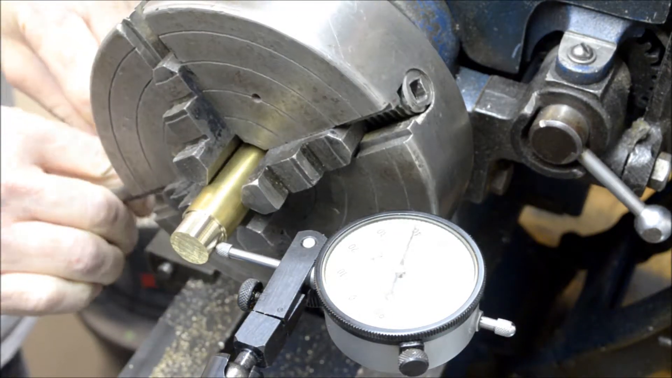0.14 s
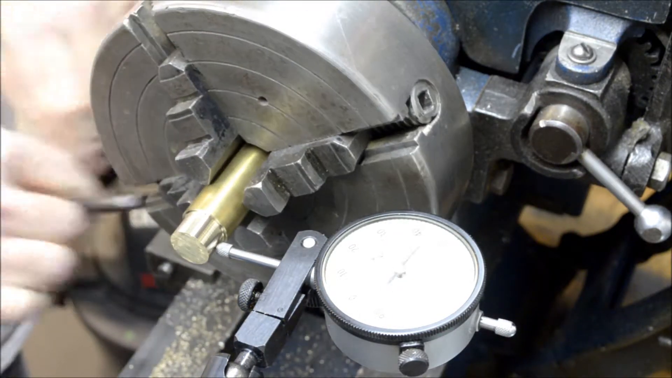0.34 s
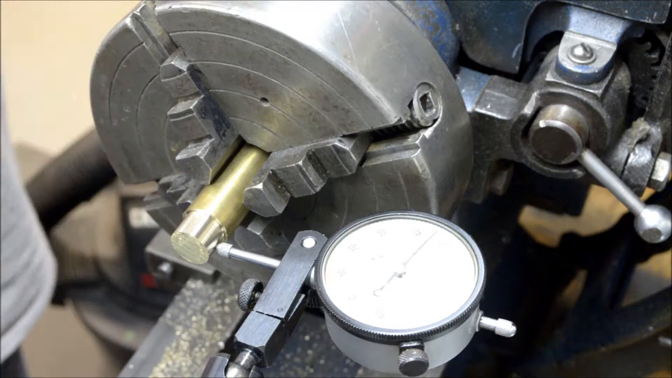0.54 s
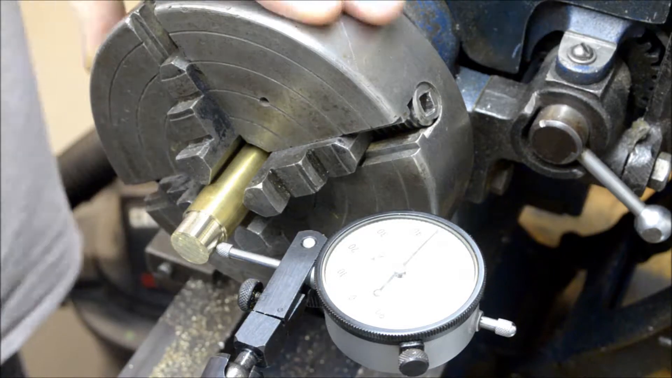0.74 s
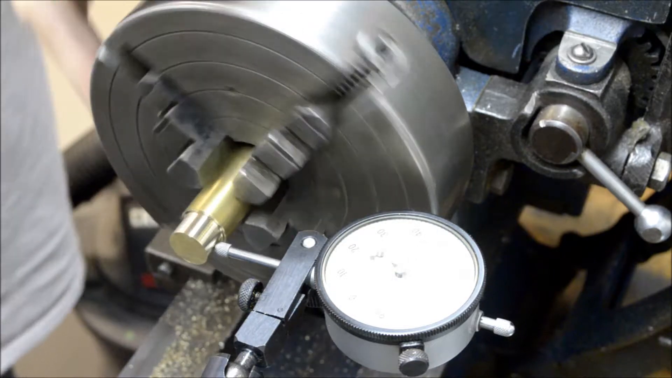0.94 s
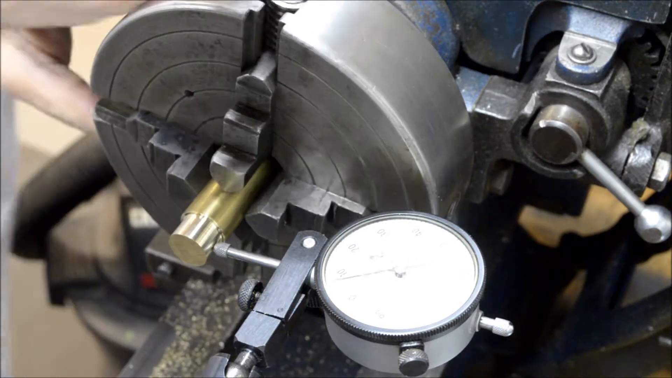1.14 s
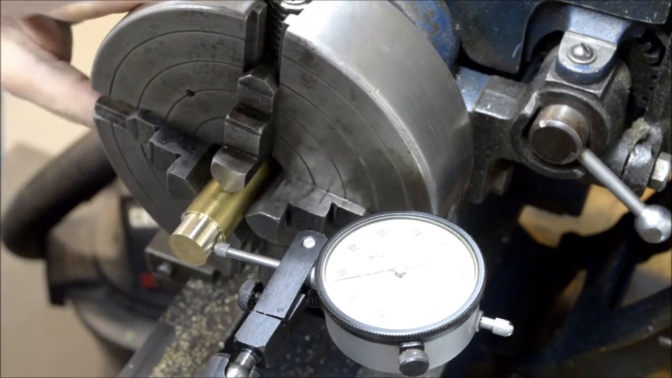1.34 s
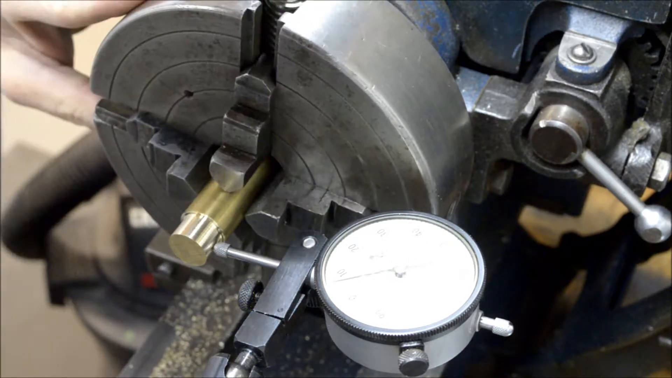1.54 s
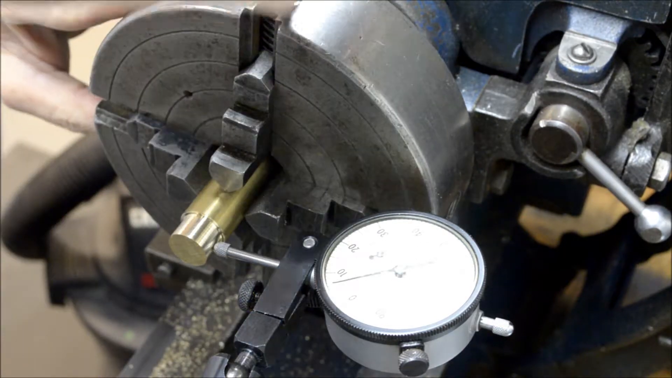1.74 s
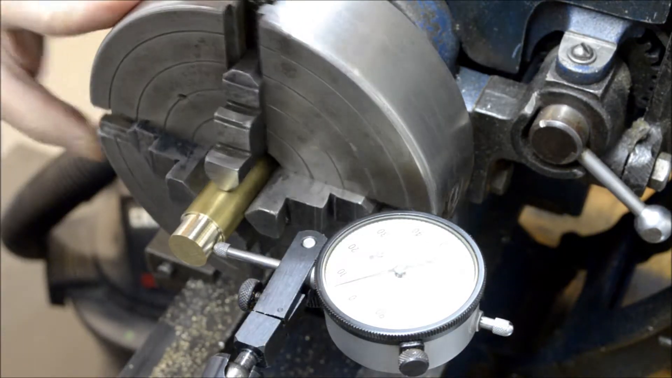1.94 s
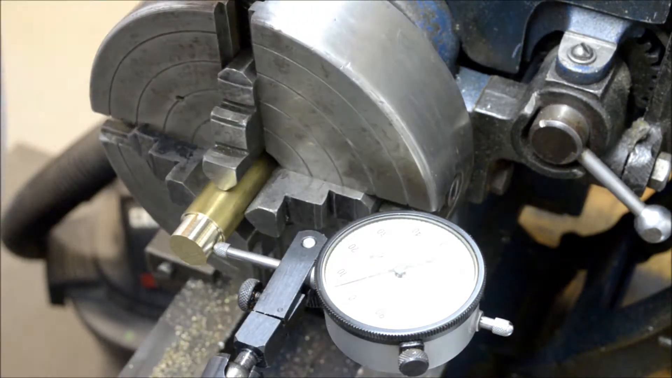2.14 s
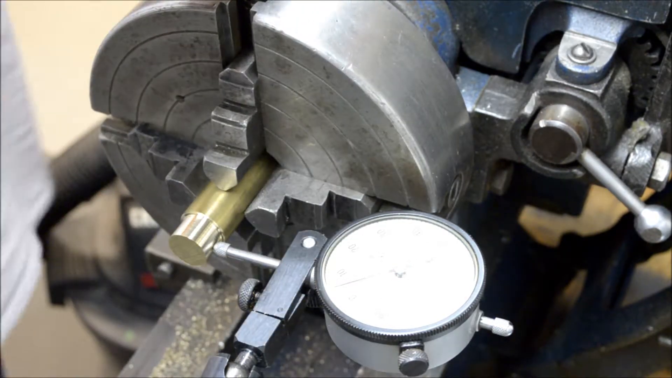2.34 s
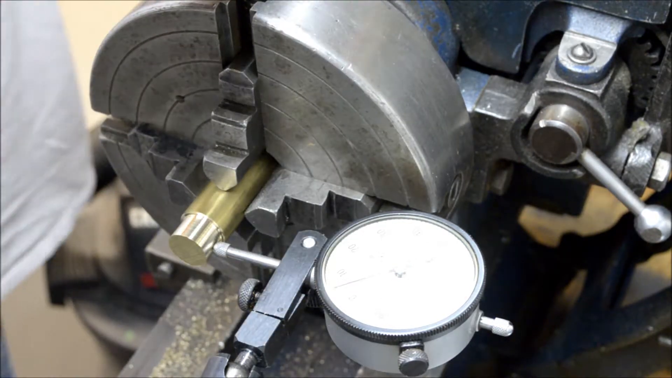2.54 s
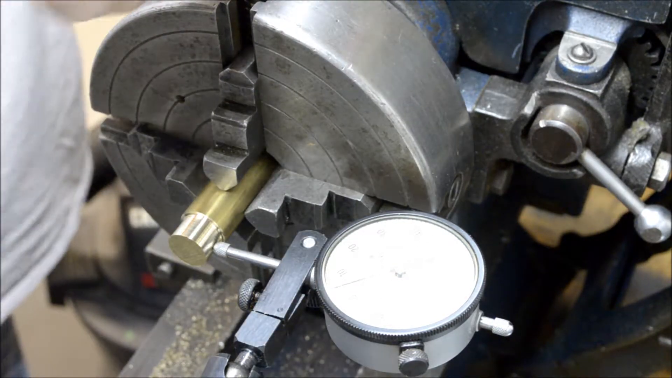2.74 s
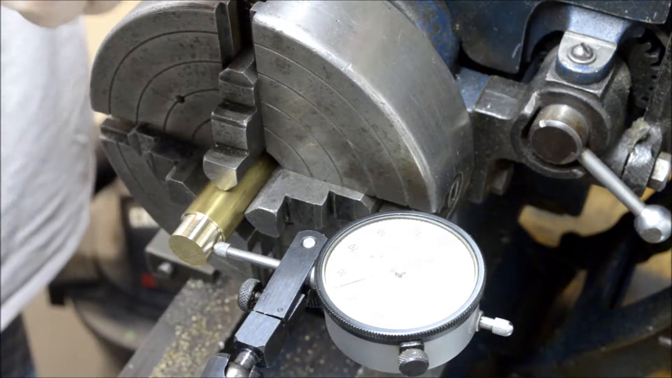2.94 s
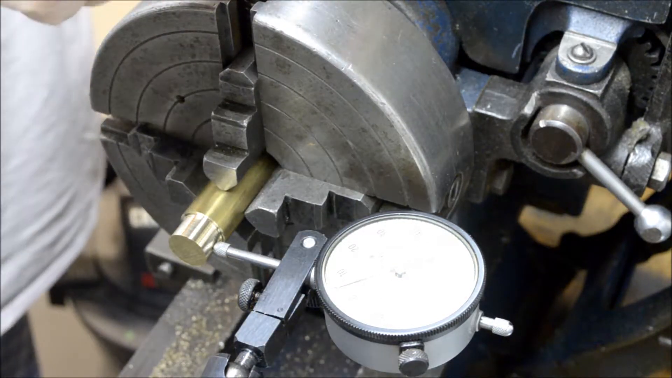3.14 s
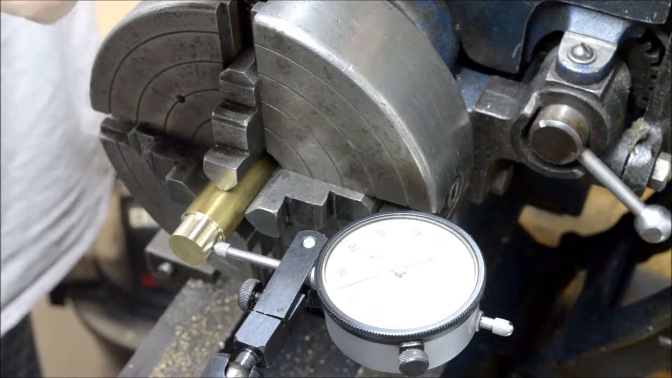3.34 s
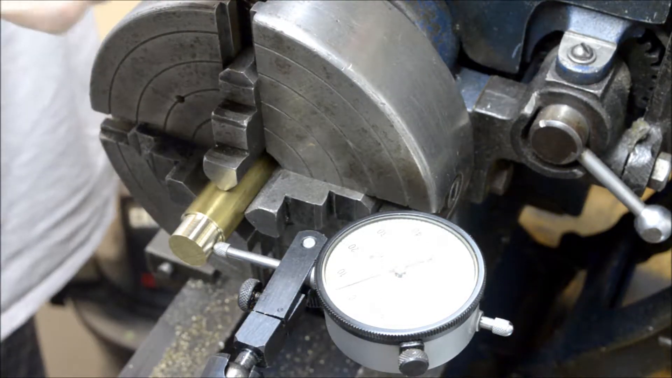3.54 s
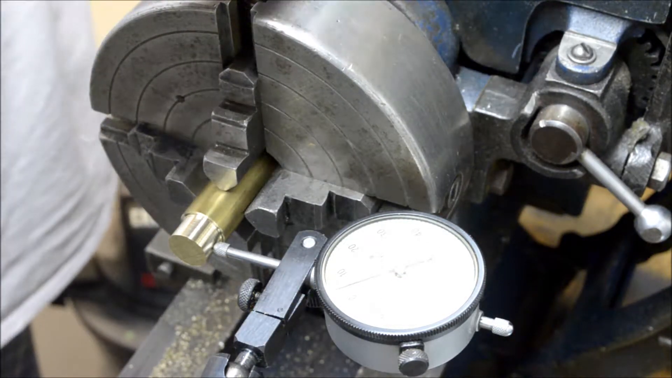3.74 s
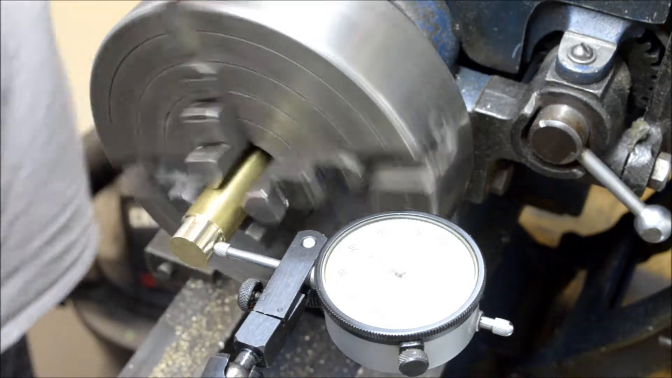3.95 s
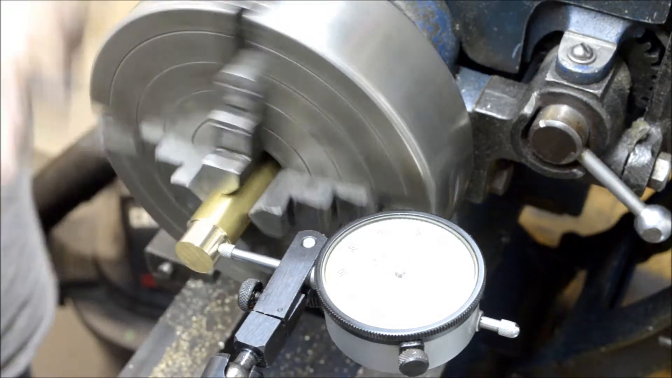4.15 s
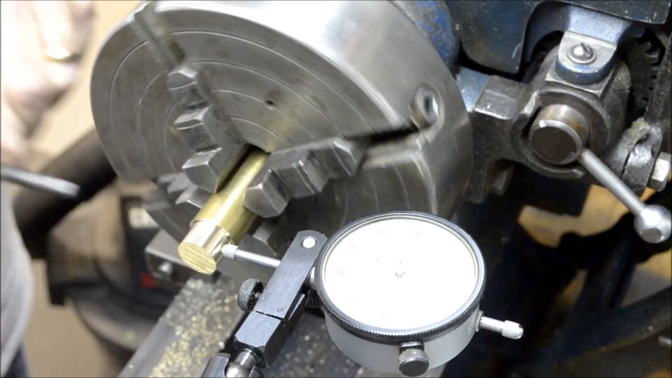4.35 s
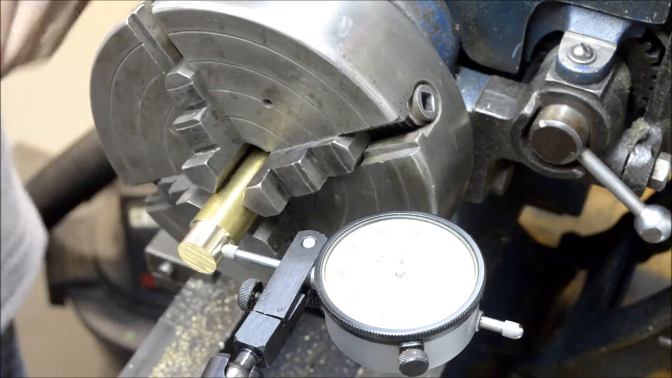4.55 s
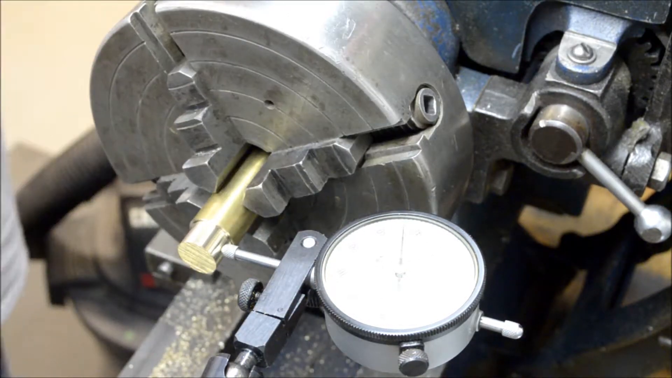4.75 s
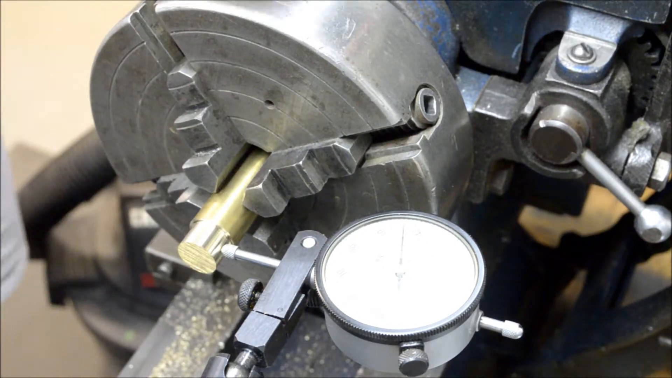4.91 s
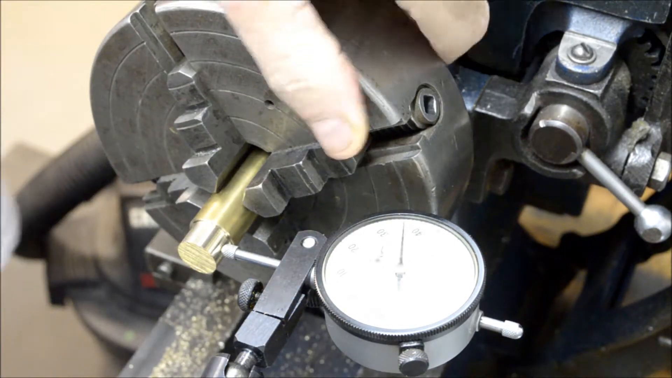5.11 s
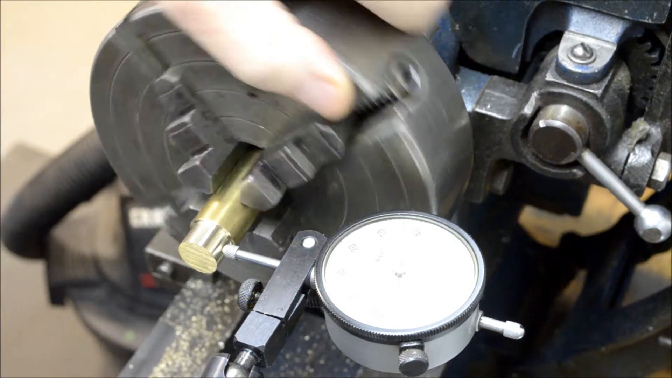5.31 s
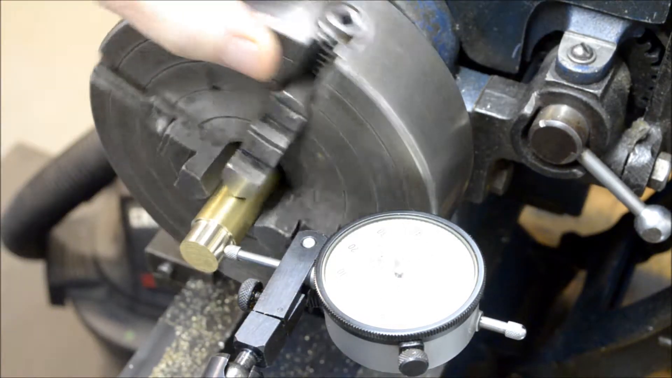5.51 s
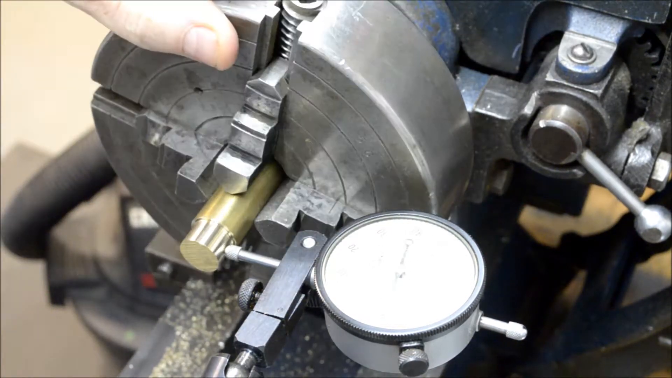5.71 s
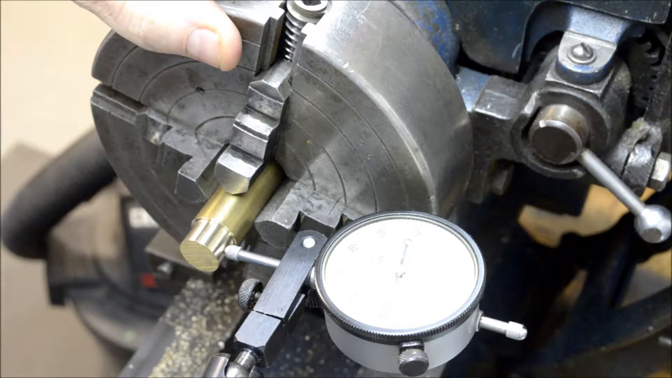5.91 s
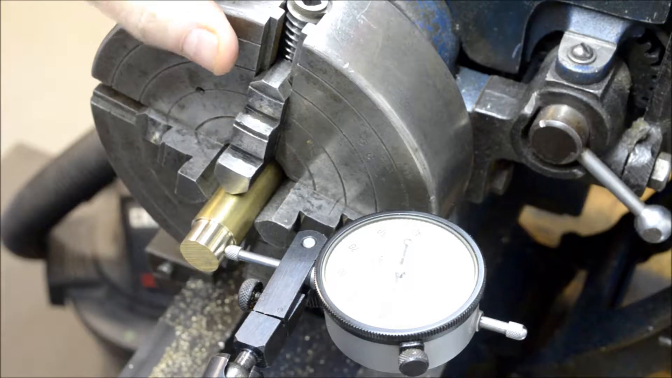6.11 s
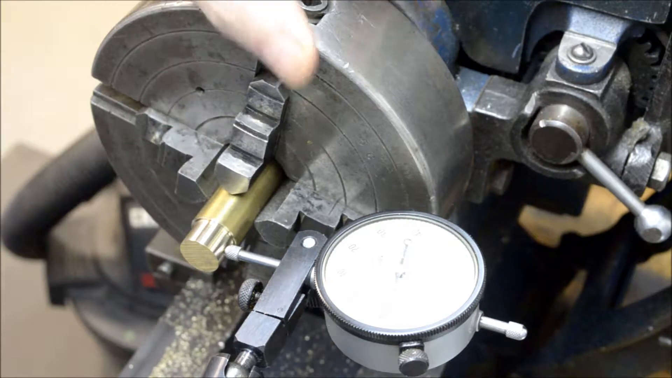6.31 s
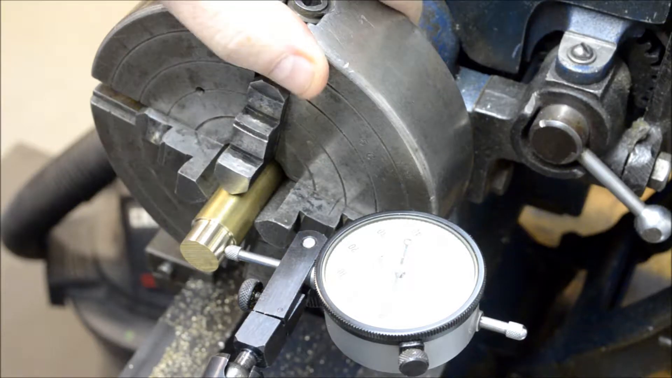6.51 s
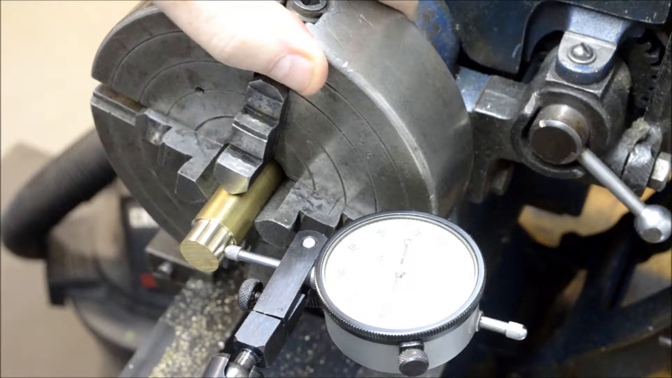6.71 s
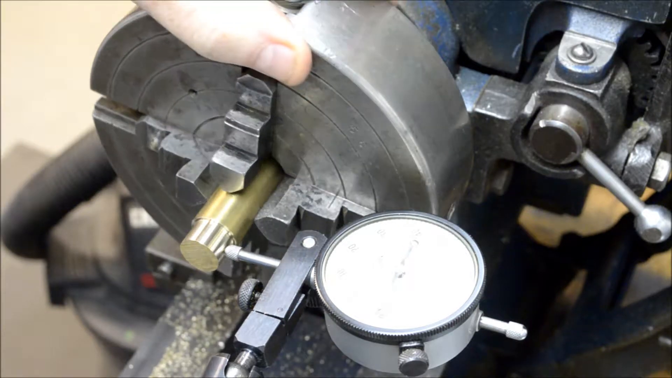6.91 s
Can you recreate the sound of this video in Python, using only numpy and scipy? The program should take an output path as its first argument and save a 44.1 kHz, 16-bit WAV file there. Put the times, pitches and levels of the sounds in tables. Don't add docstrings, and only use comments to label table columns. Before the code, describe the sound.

Close in a small workshop, a steel key clicks lightly and fingers rustle. A hand-turned lathe chuck gives a gritty, dry gear rasp, then a hard ringing knock and a sharp snap, followed by a shorter rasp. After a quiet rustling pause, the chuck swings back in two loud grinding pushes with a cluster of bright clicks, judders faintly, then rasps again and ends in a slow toothy scrape and key clicks.

```python
import sys
import numpy as np
from scipy import signal
from scipy.fft import rfft, irfft, next_fast_len
from scipy.io import wavfile
from scipy.ndimage import uniform_filter1d

SR = 44100
rng = np.random.default_rng(int(sys.argv[2]) if len(sys.argv) > 2 else 0)


def generate_wav(signal):
    frames = np.transpose(np.atleast_2d(signal))
    scaled = np.clip(frames, -1, 1) * 32767
    pcm = np.round(scaled).astype(np.int16)
    wavfile.write(sys.argv[1], SR, pcm)


def invert_db(level):
    return 10 ** (np.asarray(level, dtype=float) / 20)


N = 307377
T = np.arange(N) / SR

# t/s, level/dB (follows speed), bite/dB (how hard the flanks press)
TURNS = [
    [(.85, -65, -14), (.888, -42, 5), (.924, -42, -6), (.95, -47, 10.5), (1.04, -45, -1), (1.074, -48, 10),
     (1.158, -48, 13), (1.218, -55.5, -10), (1.26, -81, -3)],
    [(1.81, -71, -12), (1.82, -50, -10), (1.86, -50.5, -5), (1.912, -46, -4), (2.0, -53.5, 2),
     (2.044, -49, -4), (2.09, -72, 8)],
    [(5.27, -76, -9), (5.284, -52.5, -8), (5.342, -45.5, 8.5), (5.436, -44.5, -4), (5.456, -49, 6.5),
     (5.588, -43.5, 5), (5.64, -48.5, -5), (5.702, -62, 10), (5.72, -69, -6)],
    [(6.75, -91, -18), (6.776, -71, 3), (6.792, -55.5, -5.5), (6.932, -54.5, 4.5), (6.97, -75, 20)],
]
# t/s, level/dB, bite/dB
NUDGES = [
    [(3.85, -87, -5), (3.86, -48, 2), (3.904, -43.5, 6), (3.954, -44.5, 2.5), (3.978, -50.5, 11),
     (4.003, -41, 6), (4.039, -41, 0), (4.071, -43.5, 5), (4.14, -41, 3)],
    [(4.14, -43.5, 10.5), (4.21, -42, 4.5), (4.25, -49, 6.5), (4.26, -43, 3), (4.328, -41.5, 5),
     (4.382, -45, -5), (4.46, -63.5, -15)],
    [(4.522, -69, -6), (4.535, -64, 1), (4.63, -64.5, 1), (4.66, -74, -10)],
    [(4.71, -69, -15), (4.746, -60.5, -18), (4.776, -62, -3), (4.83, -72.5, -16)],
]
# f/Hz, density/dB per Hz
SCRAPE_COLOUR = [(120, -48), (200, -13), (254, 9), (440, -12.5), (590, -6), (683, -30), (749, -9),
                 (968, -11), (4120, -9), (5630, -8.5), (8580, -5.5), (11300, -17.5), (13000, -32),
                 (16000, -44)]
# f/Hz, width/Hz, level/dB
GEAR_RINGS = [(600, 27, -5), (746, 9.8, -2), (1206, 89, -6.5), (1806, 71, -6), (2190, 47, -2),
              (2420, 37, -0.5), (2730, 170, -2.5), (3180, 110, -7.5), (4010, 57, 2.5), (4740, 45, 0),
              (5040, 44, 6), (5400, 34, -2.5), (5786, 60, 3.5), (6370, 160, -1.5), (6500, 21, -11),
              (7290, 50, 0.5), (7710, 40, -3.5), (8340, 83, -0.5)]
# middle t/s, half length/s, f/Hz, level/dB over the body of the rasp
SINGS = [(0.89, 0.018, 3210, -2), (.92, 0.0099, 2640, -11), (0.98, 0.012, 4740, -6), (1.01, .012, 6370, 5),
         (1.033, 0.0064, 1990, -1), (1.07, .012, 3480, 2.5), (1.095, 0.021, 8340, 0),
         (1.097, 0.022, 3890, 4), (1.137, 0.0088, 4100, 7), (1.165, 0.011, 7290, 5),
         (1.175, 0.026, 623, -13), (1.876, .03, 1300, -3.5), (2.02, 0.029, 745, -15),
         (3.907, 0.055, 4050, 4), (3.942, .015, 2450, -7), (4.003, 0.011, 4100, 4.5),
         (4.023, 0.016, 7300, -5), (4.03, 0.0083, 2400, -6), (4.07, 0.0072, 4200, -7),
         (4.115, 0.0072, 3200, 1.5), (4.165, 0.013, 1620, -4), (4.182, 0.013, 4100, 2.5),
         (4.19, 0.057, 707, -17), (4.27, 0.0083, 2730, -9), (4.333, 0.0089, 1980, -6.5),
         (4.327, 0.014, 7450, -8), (4.343, 0.033, 600, -20), (5.333, 0.0078, 4100, 2),
         (5.366, 0.021, 8340, -9), (5.42, 0.033, 3320, -5), (5.508, 0.033, 7560, -3),
         (5.519, 0.04, 4010, 7), (5.564, 0.022, 8340, -2), (5.599, 0.019, 3230, 0),
         (5.623, 0.016, 600, -13), (5.655, .02, 2730, -4), (6.827, 0.029, 2510, 0),
         (6.893, 0.026, 4100, 1.5), (4.423, .012, 9600, -5), (5.296, 0.012, 1280, -4),
         (5.401, 0.0055, 7000, 5.5), (4.023, 0.0098, 8000, 0), (3.936, .01, 4300, 3),
         (4.406, 0.012, 4900, -5), (1.033, 0.025, 1510, -6.5), (1.19, 0.049, 806, -8.5),
         (6.797, 0.01, 2920, 3), (6.895, 0.01, 8340, 8.5)]
# middle t/s, half length/s, low level/dB, high level/dB over the body
JUDDER = [(4.556, .012, 0, -4), (4.576, 0.0075, 6.5, 3), (4.597, .006, 2, 8), (4.613, .005, 3, 4),
          (4.629, 0.0055, 7, 7), (4.763, 0.007, -3, -5), (4.784, 0.0076, 0, -5)]
JUDDER_LOW_HZ, JUDDER_HIGH_HZ = (1710, 3270), (7000, 11400)
FULL_SPEED_DB = -45
GROWL_DB, GROWL_PER_DB_SLOWER = -10.5, 0.4427
WHET_DB, WHET_PER_DB_SLOWER = -15, 0.8
HISS_DB, HISS_PER_BITE = -1, 0.58

# t/s, peak level/dB, weight/dB, brightness/dB, rattle/ms
CLICKS = [(0.173, -42, -16, 1, 19), (0.2541, -57, -8, -12, 45), (0.2744, -47.5, -9.5, -12, 7),
          (0.408, -62.5, -16, 10, 17), (0.7108, -77, -10, 14, 7.2), (1.5777, -48.5, -21, -4, 21),
          (1.9142, -39, -10, 8, 8.7), (2.3202, -62, -1, -11, 13), (3.335, -62, -4.5, -11, 15),
          (3.4448, -74, -8, -12.5, 13), (4.1372, -28, -32, 1, 6.2), (4.1432, -29.5, -15, 8, 4.1),
          (4.1485, -34, -30, 0, 4.9), (6.889, -44, -11, 3, 8.9), (6.9183, -38.5, -27, -6.5, 13)]
# t/s, peak level/dB, weight/dB, brightness/dB, rattle/ms
SNAP = [
    (1.6725, -46.5, -6.5, -7.5, 9),
    (1.6797, -22, -14, 6, 2.5),
    (1.6825, -25, -10.5, 4.5, 15),
]
# t/s, peak level/dB, weight/dB, brightness/dB, rattle/ms
KNOCKS = [
    (0.8595, -43, 2, 5.5, 8.9),
    (1.3998, -34, -1.5, -4.5, 13.5),
    (1.8403, -42.5, 2, -3, 11),
]
# t/s, peak level/dB, weight/dB, brightness/dB, rattle/ms
SCUFFS = [(0.1501, -57, 3, -15, 38), (0.2453, -60, -5, 2, 24), (0.3514, -63, -22, 3, 36),
          (0.825, -48.5, 0, -14, 36), (1.1569, -46.5, 4, -4, 27), (1.349, -61, 3, -3, 14),
          (1.5991, -58.5, -2, 0, 15), (1.6292, -59.5, 5, -6, 24), (1.8185, -39.5, -16, -6.5, 15),
          (3.6915, -41.5, -1.5, -7, 8.8), (3.6975, -42.5, -3, -5, 6.4), (3.704, -49.5, 2, -12, 17),
          (3.8132, -55, -8, -11, 19), (4.978, -51.5, 1, -16, 9.7), (4.9835, -45, -6, -10, 32),
          (4.9982, -50.5, -6, -9, 26), (5.0693, -55.5, 4, -10, 8), (5.2824, -42.5, 1, -7.5, 21),
          (6.77, -47.5, -5, -14, 15)]
# t/s, peak level/dB, brightness/dB, rattle/ms
SKIPS = [(0.8755, -41, -14, 13), (0.8847, -35.5, 0, 30), (0.998, -39, -2, 18), (1.011, -35.5, -3.5, 49),
         (1.158, -43, 2, 8), (5.416, -50, -8, 8), (5.837, -67, -8, 6.4), (6.395, -68, -10, 8.6),
         (6.418, -72, -12, 14), (1.131, -51, -6, 6.8), (3.946, -32, -7, 19), (3.9983, -36, -6, 10),
         (4.3146, -39, -13, 12), (0.912, -43, -11, 7.3), (1.204, -38.5, -7.5, 11), (1.8613, -39, -10, 15),
         (2.0304, -44.5, -1, 27), (2.0654, -42.5, -7, 9.3), (2.094, -38.5, -13, 17), (3.843, -52, -10, 14),
         (3.8566, -48, -1, 45), (4.209, -32, -10, 12), (4.2573, -35.5, -26, 15), (5.33, -38.5, -4, 15),
         (5.4005, -34.5, -7, 37), (5.6176, -36, -9, 40), (5.686, -41.5, -2.5, 12),
         (5.7256, -39.5, -5.5, 18.4), (6.758, -54.5, -4, 17), (6.791, -44.5, -3, 20), (6.809, -46, 2, 19),
         (6.8249, -46, 6, 14), (6.8362, -42.5, -7, 28), (6.8542, -46, 6, 12), (6.872, -43, 2.5, 13)]
SKIP_WEIGHT_DB = -25.5
# f/Hz, level/dB, t60/s
KEY_MODES = [(1084, -4.5, 0.085), (2620, 1.5, 0.039), (3800, -23, 0.098), (4030, 0, 0.049),
             (4224, -11.5, 0.024), (5070, -2.5, 0.066), (6247, -7, 0.033), (6777, -4, 0.11),
             (6770, 0, 0.051), (6890, 3.5, 0.066), (7095, -6, 0.074), (7340, -1, 0.043), (7450, -4, 0.034),
             (8510, -10.5, 0.045), (8414, -2, .04), (9100, -15, .045), (8900, -19, .045),
             (10900, -1.5, 0.039), (14330, 1, .07)]
# f/Hz, level/dB, t60/s
SCREW_MODES = [(1100, -9.5, .07), (2580, -2.5, 0.04), (3684, -6, .02), (4300, -3.5, .02), (4786, -9, .025),
               (6070, -3.5, 0.027), (6620, 1, .03), (7100, 5, .04), (7450, 0.5, .03), (8040, -2.5, 0.022),
               (9200, -6.5, .015), (11500, 2, .025), (14340, 7, .07), (15430, 0, .05)]
# f/Hz, level/dB, t60/s
CHUCK_MODES = [(734, -2.5, 0.4), (1079, -1.5, 0.21), (1384, -6.5, 0.52), (1420, -18, 0.28),
               (2066, -32, 0.18), (2550, 3.5, 0.082), (2908, -24.5, 0.12), (3668, -18.5, 0.13),
               (4100, -20, 0.12), (4370, -26, 0.07), (6590, -8, 0.1), (6800, -26, 0.14), (8100, -1.5, 0.15),
               (7660, -21, 0.09)]
ZONES_HZ = [345, 1000, 3100, 7500, 10500, 15000]
# t/s, peak level/dB
THUMPS = [(0.862, -52.5), (1.154, -54), (1.4013, -41), (1.5768, -67), (1.6796, -37.5), (1.822, -61),
          (1.841, -45.5), (1.9142, -59), (3.698, -46.5), (4.982, -66.5), (5.2814, -51)]
# f/Hz, level/dB, t60/s
BED_MODES = [(341.4, -7, 0.28), (401, 5, 0.054), (307, 1, 0.11)]
SHOVE_S = .013
# t/s, peak level/dB, f/Hz, length/ms
BLIPS = [(0.003, -68, 1780, 16), (.153, -59, 1400, 9), (.245, -57, 1746, 56), (.252, -54, 7900, 12),
         (.273, -53, 7950, 9), (.275, -55, 2300, 8), (0.284, -61, 1500, 19), (0.294, -52.5, 1320, 10),
         (0.829, -50, 1190, 11), (.866, -43, 705, 19), (.861, -43, 1460, 9.5), (1.635, -52, 744, 30),
         (1.632, -60, 1520, 18), (1.786, -54, 1150, 6), (2.314, -69.5, 7610, 30), (4.986, -55, 1360, 15),
         (5.061, -55, 1340, 13), (4.984, -52, 1700, 20), (.41, -65, 7500, 10), (5.284, -46, 1214, 16),
         (3.693, -43.5, 2460, 16), (3.692, -45.5, 2950, 12), (3.698, -53, 1000, 11), (3.703, -61, 4950, 18),
         (1.401, -46, 2570, 11), (3.735, -63, 310, 23), (.173, -49.5, 2230, 13), (.175, -52, 1200, 10),
         (.178, -57, 600, 22), (.296, -60, 740, 24), (.31, -62, 340, 60), (5.885, -67, 7600, 5),
         (5.885, -68, 6400, 5), (5.976, -71, 7300, 5), (3.697, -45.5, 5100, 4.6), (5.728, -45, 2460, 4.7),
         (5.727, -47, 4600, 6), (5.838, -65, 2220, 12), (5.918, -64.5, 1280, 9), (5.917, -69, 3900, 6),
         (6.348, -65, 1560, 20), (6.348, -70.5, 3030, 15), (6.42, -68, 4450, 20), (1.688, -35, 2600, 9),
         (1.683, -33, 1100, 10), (1.681, -40, 14340, 16), (1.401, -46, 1080, 14)]
# middle t/s, half length/s, level/dB, brightness/dB
RUSTLE = [(0.0, 0.057, -74, -1), (0.39, 0.16, -69.5, -3), (0.585, 0.089, -86.5, 3),
          (0.788, 0.12, -73.5, -1), (1.318, 0.088, -75, -3), (1.53, 0.14, -72.5, -1.5),
          (2.312, 0.13, -68.5, -8.5), (2.544, 0.11, -75.5, -18.5), (2.762, .1, -86.5, 5.5),
          (3.282, 0.25, -81.5, -2.5), (3.454, 0.0088, -66, -6.5), (3.672, 0.08, -78, 4),
          (4.549, 0.039, -67.5, 7), (4.697, 0.048, -64.5, -11.5), (4.91, 0.19, -74.5, -3),
          (5.062, 0.036, -70, -8), (5.204, 0.088, -70.5, -5), (5.798, 0.078, -80, -15),
          (6.16, 0.087, -77.5, -7), (6.285, 0.073, -74, -25), (6.377, 0.025, -69.5, -14),
          (6.43, 0.033, -64.5, -17), (6.506, 0.038, -72, -20.5), (6.598, 0.084, -74, -25)]

ROOM_T60_S, ROOM_TREBLE_T60_S, ROOM_DB = 0.21, 0.13, -10
# f/Hz, density/dB per Hz
AIR_COLOUR = [(65, -44.5), (110, -10.5), (197, -6), (228, -5), (299, -3.5), (384, -8.5), (417, -8.5),
              (536, -9), (1040, -13), (1130, -12), (2080, -16), (2400, -19), (2900, -20), (16000, -38.5)]
AIR_DB = -68.5
RUMBLE_HZ, RUMBLE_WIDTH_HZ, RUMBLE_DB = 77.54, 15.4, -64
# f/Hz, rms level/dB
WHINE = [(419.9, -80), (1680, -79.5), (1798, -86), (2040, -81), (2159, -85.5), (2998, -87), (3359, -89)]
# f/Hz, width/Hz, depth/0-1
DIPS = [(5715, 400, 0.88), (6884, 170, 0.6)]
TOP_HZ = 13690


def unit(x):
    return x / np.sqrt(np.mean(x ** 2))


def shape(hz, points):
    at, db = np.transpose(points)
    return invert_db(np.interp(np.log(hz + 1), np.log(at), db))


def ring(hz, centre_hz, width_hz):
    return 1j * hz * width_hz / (centre_hz ** 2 - hz ** 2 + 1j * hz * width_hz)


def colour(x, gain):
    size = next_fast_len(len(x))
    spectrum = rfft(x, size) * gain(np.fft.rfftfreq(size, 1 / SR))
    return irfft(spectrum, size)[:len(x)]


def band(x, lo_hz, hi_hz):
    sos = signal.butter(3, [lo_hz, hi_hz], "band", fs=SR, output="sos")
    return unit(signal.sosfilt(sos, x))


def walk(rate):
    k = int(SR / rate)
    held = np.repeat(rng.standard_normal(N // k + 1), k)
    return unit(uniform_filter1d(uniform_filter1d(held, k), k)[:N])


def grit(size, spread_db):
    hardness = np.minimum(rng.exponential(size=size), 4)
    return unit(rng.standard_normal(size) * invert_db(spread_db * hardness))


def play(tables, fade_s):
    out = np.full((len(tables[0][0]) - 1, N), -140.)
    for table in tables:
        s, *columns = np.transpose(table)
        on = (T >= s[0]) & (T < s[-1] + fade_s)
        out[:, on] = [np.interp(T[on], s, c) for c in columns]
        out[0, on] -= 7 * np.clip((T[on] - s[-1]) / fade_s, 0, 1)
    return out


def flanks():
    ticks = (rng.random(N) < 400 / SR) * rng.random(N)
    tick_decay = np.exp(-1 / (0.0006 * SR))
    chatter = invert_db(0.53 * walk(45)) * (1 + 1.4 * signal.lfilter([1], [1, -tick_decay], ticks))
    scrape = unit(colour(grit(N, spread_db=2.5) * chatter, lambda f: shape(f, SCRAPE_COLOUR)))
    contacts = [grit(N, spread_db=2.5) * chatter for _ in range(3)]
    rings = np.zeros(N)
    for k, (hz, width_hz, db) in enumerate(GEAR_RINGS):
        tone = unit(colour(contacts[k % 3], lambda f: ring(f, hz, 30 + width_hz)))
        rings += invert_db(db + 1.9 * walk(25)) * tone * np.sqrt(width_hz)
    return scrape + unit(rings)


def gears():
    sound = flanks()
    body_db, bite_db = play(TURNS + NUDGES, fade_s=0.03)
    slower_db = np.clip(FULL_SPEED_DB - body_db, 0, 30)
    body = invert_db(-1.0) * band(sound, 1780, 3620)
    growl = invert_db(GROWL_DB + GROWL_PER_DB_SLOWER * slower_db) * band(sound, 427, 1580)
    whet = invert_db(WHET_DB + WHET_PER_DB_SLOWER * slower_db) * band(sound, 3750, 4190)
    hiss = band(sound, 5230, 21000) + invert_db(-0.5) * band(sound, 4150, 5460)
    hiss = invert_db(HISS_DB + HISS_PER_BITE * bite_db) * hiss
    return invert_db(body_db) * (sings(sound) + body + growl + whet + hiss)


def sings(sound):
    out = np.zeros(N)
    spread = 1.096
    for s, half_s, hz, db in SINGS:
        near = np.abs(T - s) < 2.5 * half_s
        swell = np.exp(-((T[near] - s) / half_s) ** 2)
        out[near] += invert_db(db) * swell * band(sound[near], hz / spread, hz * spread)
    low, high = band(sound, *JUDDER_LOW_HZ), band(sound, *JUDDER_HIGH_HZ)
    for s, half_s, low_db, high_db in JUDDER:
        out += np.exp(-((T - s) / half_s) ** 2) * (invert_db(low_db) * low + invert_db(high_db) * high)
    return out


def blows(events, modes, ring_db, scatter_db, top_db, damping, crack=0.72):
    size, out = 16384, np.zeros(N + 16384)
    t, hz = np.arange(size) / SR, np.fft.rfftfreq(size, 1 / SR)
    part = [(-1) ** k * ring(hz, f, damping * 2.2 / t60) * invert_db(db) * np.sqrt(t60)
            for k, (f, db, t60) in enumerate(modes)]
    body = (hz > 1800) & (hz < 5500)
    for s, peak_db, weight_db, bright_db, rattle_ms in events:
        span = max(rattle_ms, 1) / 1000
        force = (crack * np.exp(-t / .0025) + .6) * (1 - np.exp(-t / .0003)) * np.exp(-(t / span) ** 3)
        push = rfft(force[:6000] * grit(size=6000, spread_db=2.5), size)
        mix = invert_db(ring_db + scatter_db * rng.standard_normal(len(modes)))
        reach = np.abs(np.interp(np.transpose(modes)[0], hz, push)) / np.sqrt(np.mean(np.abs(push) ** 2))
        mix = mix / np.clip(reach, .5, 3)
        zones_db = [weight_db - 11.5, weight_db + 6.0, 0, bright_db, bright_db - 8.5, bright_db + top_db]
        blow = push * shape(hz, list(zip(ZONES_HZ, zones_db))) * (1 + mix @ part)
        size_of_body = np.percentile(np.abs(irfft(blow * body)[:600]), 97)
        k = int(s * SR)
        out[k:k + size // 2] += invert_db(peak_db) * irfft(blow)[:size // 2] / size_of_body
    return out[:N]


def key():
    clicks = blows(CLICKS, KEY_MODES, ring_db=17.5, scatter_db=3.0, top_db=-32.0, damping=3.9)
    snap = blows(SNAP, SCREW_MODES, ring_db=21.5, scatter_db=0.5, top_db=-24.5, damping=1.3, crack=3.0)
    return clicks + snap


def chuck():
    knocks = blows(KNOCKS, CHUCK_MODES, ring_db=16.5, scatter_db=1.5, top_db=-58, damping=7.0)
    scuffs = blows(SCUFFS, CHUCK_MODES, ring_db=2.5, scatter_db=5, top_db=-31.5, damping=2.1)
    light = [(s, db, SKIP_WEIGHT_DB, *rest) for s, db, *rest in SKIPS]
    skips = blows(light, CHUCK_MODES, ring_db=4.0, scatter_db=6, top_db=-27, damping=1.3, crack=0.43)
    return knocks + scuffs + skips


def thumps():
    size, out = 16384, np.zeros(N + 16384)
    t, hz = np.arange(size) / SR, np.fft.rfftfreq(size, 1 / SR)
    bed = sum(ring(hz, f, 2.2 / t60) * invert_db(db) for f, db, t60 in BED_MODES) * ring(hz, 350, 160)
    swell = np.exp(-(t / SHOVE_S - 1) ** 2)
    for s, db in THUMPS:
        rough = np.sin(2 * np.pi * BED_MODES[0][0] * t) + 3 * rng.standard_normal(size)
        thump = irfft(rfft(swell * rough) * bed)
        k = int(s * SR)
        out[k:k + size] += invert_db(db) * thump / np.abs(thump).max()
    return out[:N]


def blips():
    out, t = np.zeros(N + 8192), np.arange(8192) / SR
    for s, db, hz, length_ms in BLIPS:
        rub = t / (length_ms / 1000)
        wobble = uniform_filter1d(rng.standard_normal(len(t)), size=150)
        note = np.sin(2 * np.pi * hz * (t - 0.45 * t ** 2) + (7 + hz / 400) * wobble)
        note = note * (1 + 3 * wobble)
        k = int(s * SR)
        out[k:k + len(t)] += invert_db(db) * np.minimum(6 * rub, 1) * np.exp(-rub ** 2) * note
    return out[:N]


def rustle():
    s, half_s, level_db, bright_db = np.transpose(RUSTLE)[:, :, None]
    swell = invert_db(level_db) * np.exp(-((T - s) / half_s) ** 2)
    dull, bright = [grit(N, spread_db=1.0) * invert_db(2.4 * walk(25)) for _ in range(2)]
    bright_swell = (invert_db(bright_db) * swell).sum(0)
    return swell.sum(0) * band(dull, 549, 4700) + bright_swell * band(bright, 4500, 9900)


def room(x):
    t = np.arange(int(.6 * SR)) / SR
    noise = rng.standard_normal(len(t)) * (t > .004)
    low = colour(noise, lambda f: 1 / np.sqrt(1 + (f / 2500) ** 2))
    tail = low * invert_db(-60 * t / ROOM_T60_S) + (noise - low) * invert_db(-60 * t / ROOM_TREBLE_T60_S)
    return x + invert_db(ROOM_DB) * signal.fftconvolve(x, tail / np.linalg.norm(tail))[:N]


def shop():
    air = colour(rng.standard_normal(N), lambda f: shape(f, AIR_COLOUR))
    rumble = colour(rng.standard_normal(N), lambda f: (
        ring(f, RUMBLE_HZ, RUMBLE_WIDTH_HZ) * ring(f, 72, 50) + 0.073 * (f < 36)))
    whine = sum(invert_db(db - 0.5 + 1.3 * walk(3.8)) * np.sin(2 * np.pi * hz * T + 0.35 * walk(11))
                for hz, db in WHINE)
    return invert_db(AIR_DB) * unit(air) + invert_db(RUMBLE_DB) * unit(rumble) + whine


def scene():
    lathe = gears() + key() + chuck() + thumps() + blips() + rustle()
    return (room(lathe) + shop())[None]


def roll_off(x):
    return signal.sosfilt(signal.butter(12, 16320, fs=SR, output="sos"), x)


def record(dry):
    heard = colour(dry[0], lambda f: np.prod([1 - depth * ring(f, hz, w) for hz, w, depth in DIPS], axis=0))
    heard = colour(heard, lambda f: 1 / np.sqrt(1 + (f / TOP_HZ) ** 24) * (f < 15750))
    return roll_off(heard[None])


dry = scene()
out = record(dry)
generate_wav(out)
```